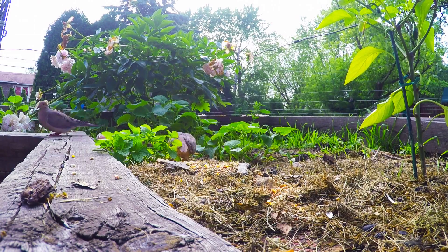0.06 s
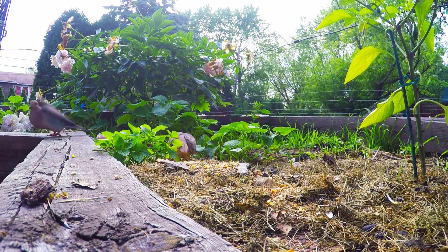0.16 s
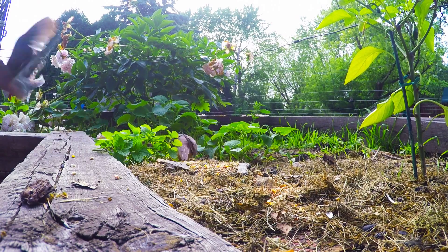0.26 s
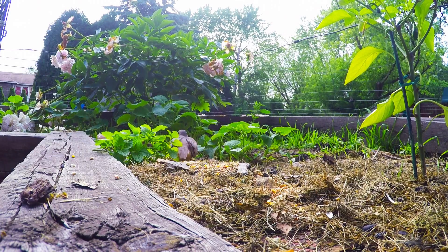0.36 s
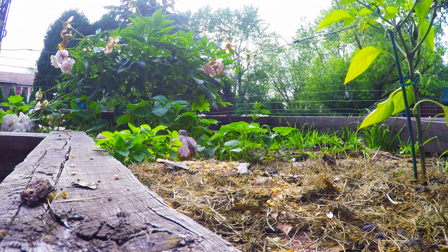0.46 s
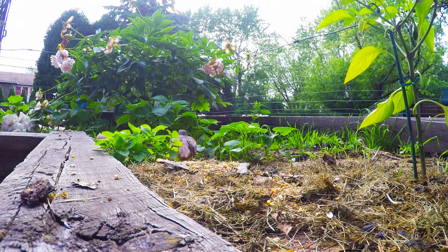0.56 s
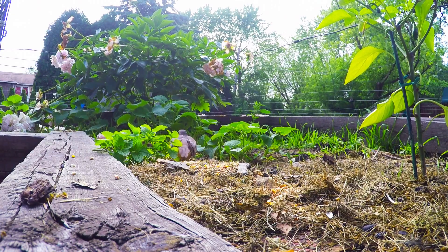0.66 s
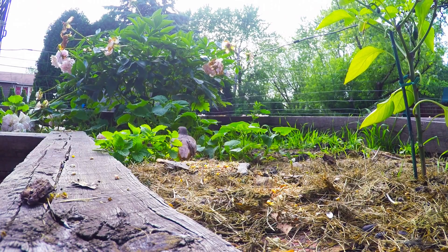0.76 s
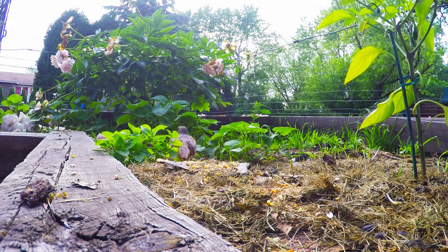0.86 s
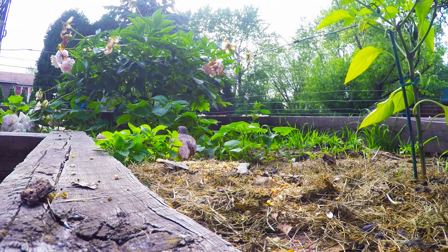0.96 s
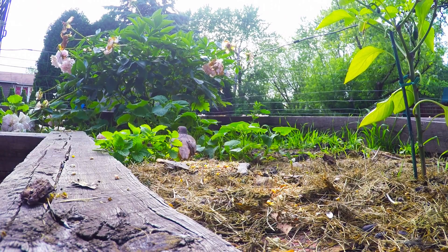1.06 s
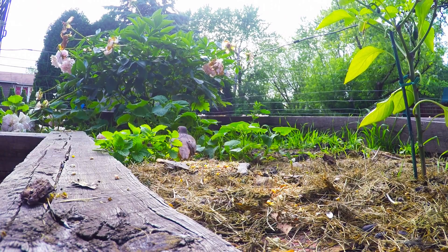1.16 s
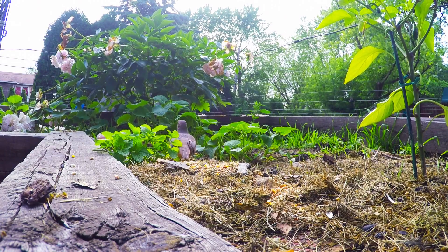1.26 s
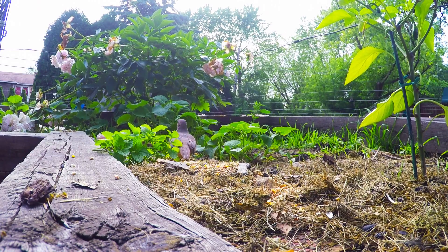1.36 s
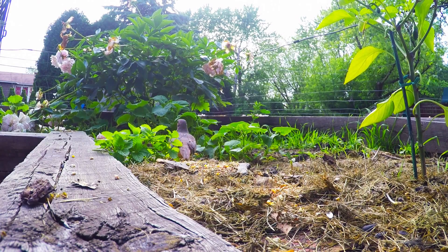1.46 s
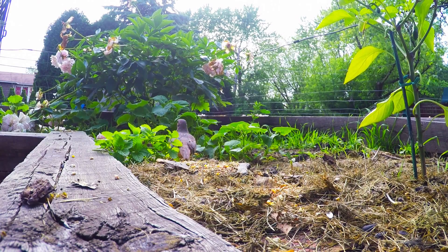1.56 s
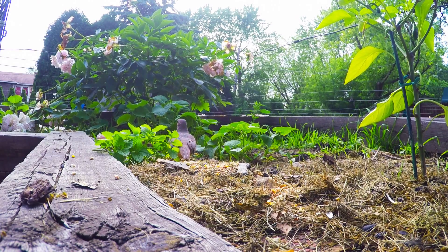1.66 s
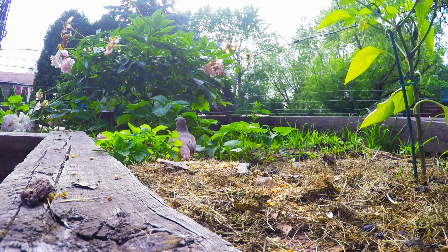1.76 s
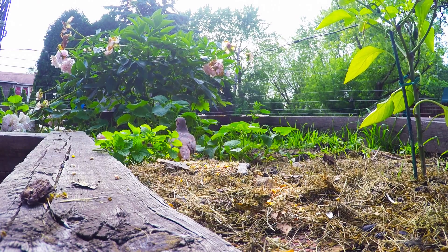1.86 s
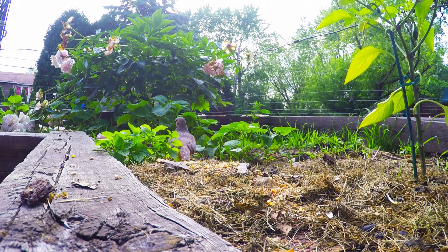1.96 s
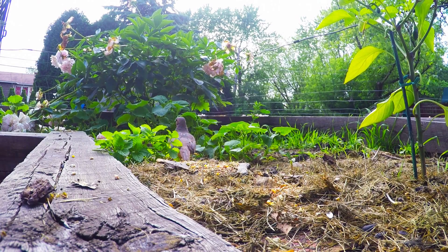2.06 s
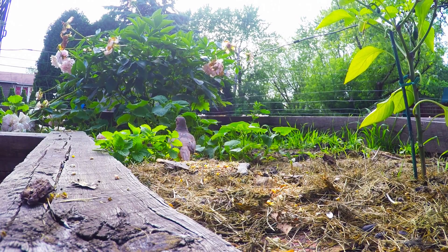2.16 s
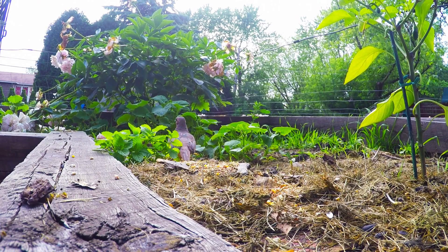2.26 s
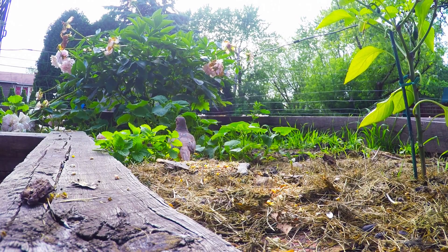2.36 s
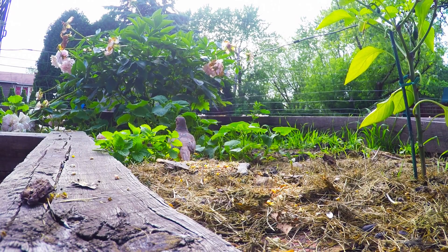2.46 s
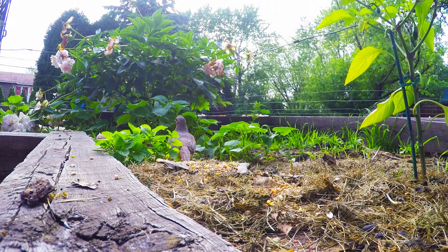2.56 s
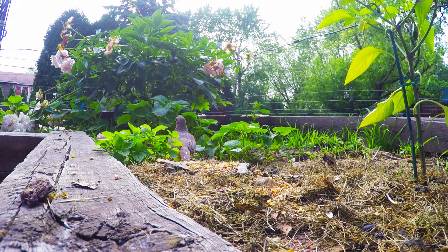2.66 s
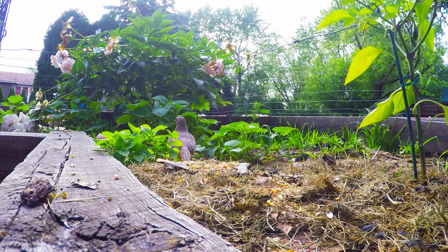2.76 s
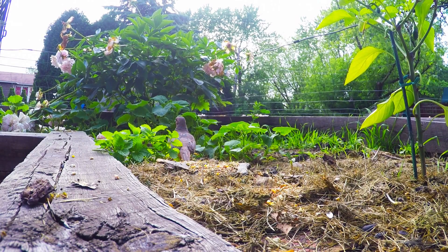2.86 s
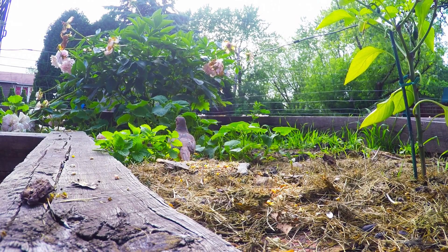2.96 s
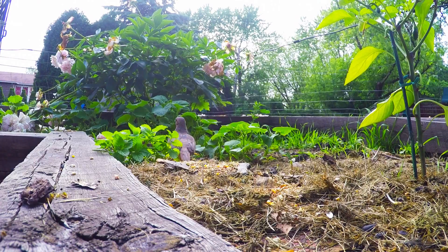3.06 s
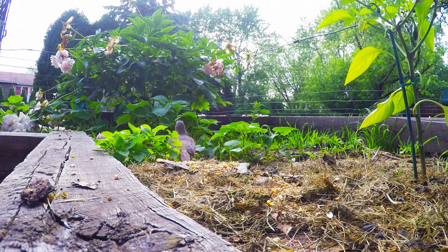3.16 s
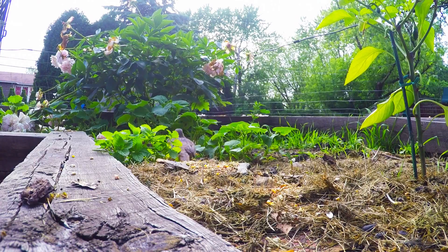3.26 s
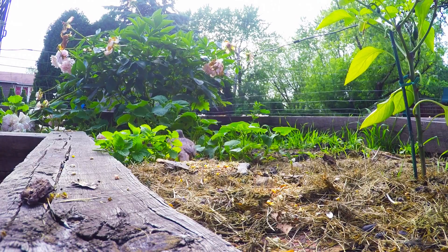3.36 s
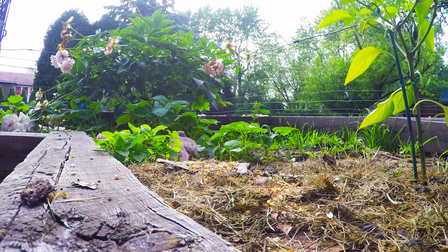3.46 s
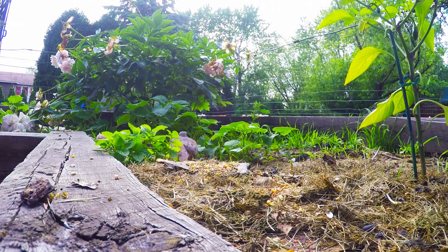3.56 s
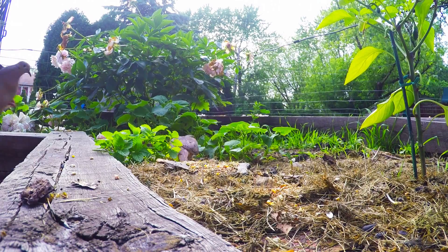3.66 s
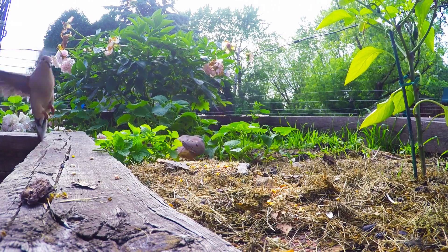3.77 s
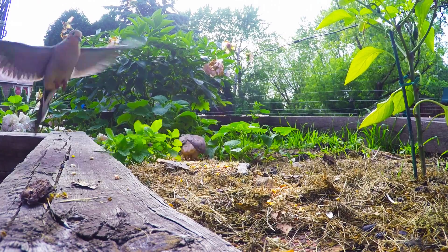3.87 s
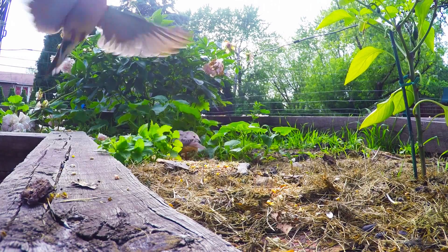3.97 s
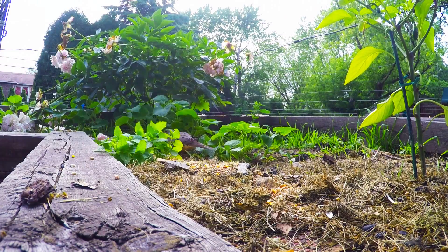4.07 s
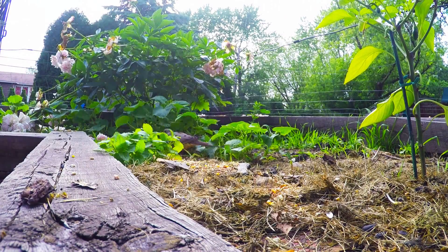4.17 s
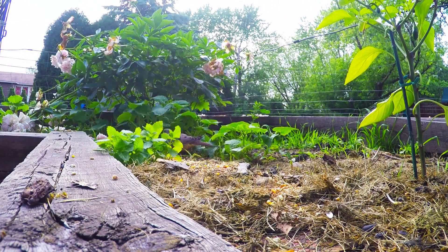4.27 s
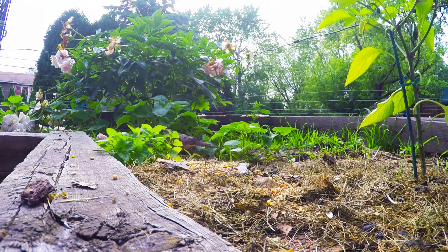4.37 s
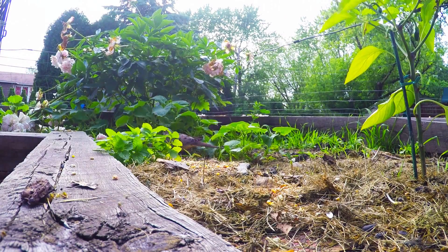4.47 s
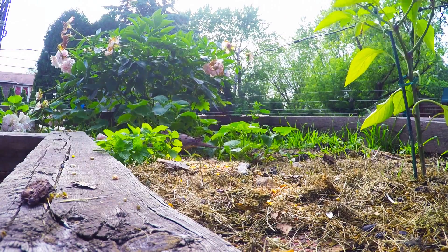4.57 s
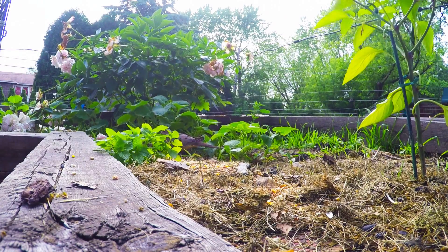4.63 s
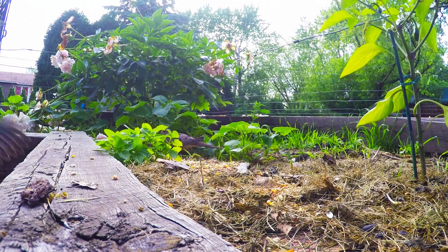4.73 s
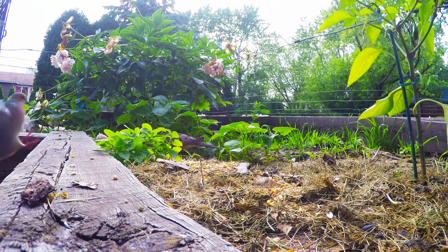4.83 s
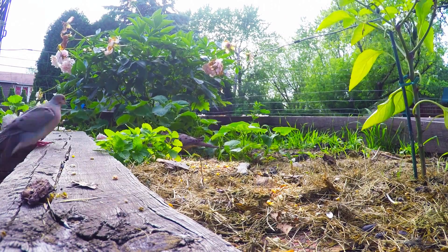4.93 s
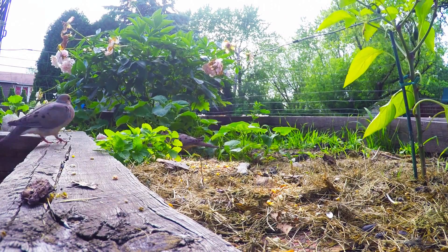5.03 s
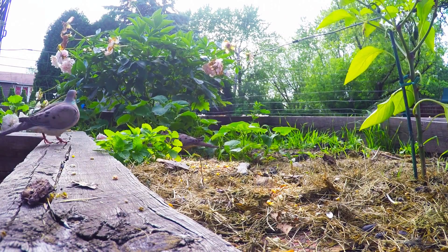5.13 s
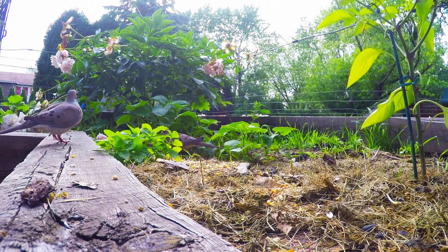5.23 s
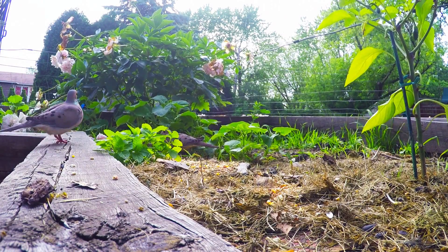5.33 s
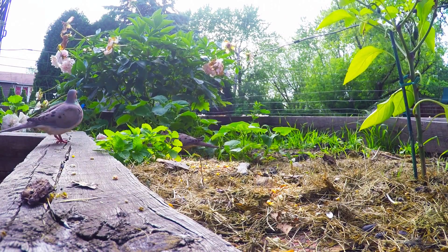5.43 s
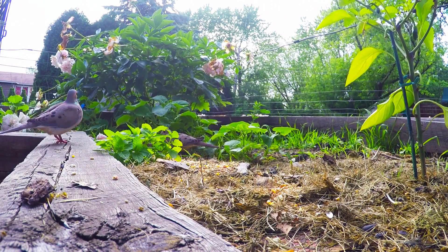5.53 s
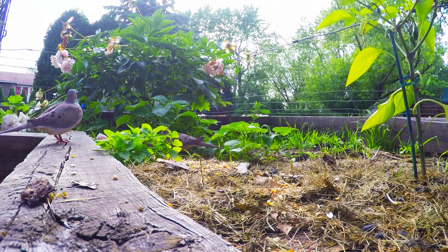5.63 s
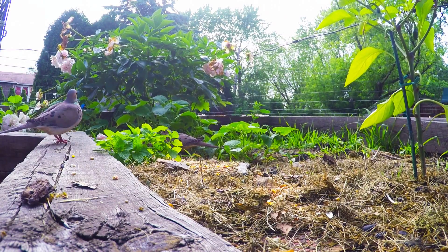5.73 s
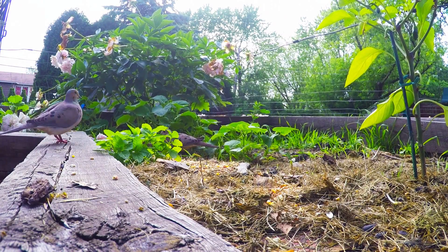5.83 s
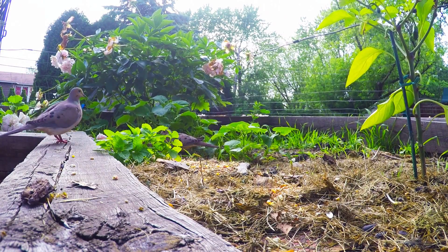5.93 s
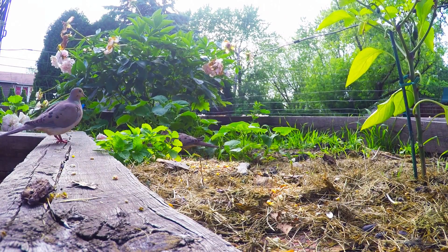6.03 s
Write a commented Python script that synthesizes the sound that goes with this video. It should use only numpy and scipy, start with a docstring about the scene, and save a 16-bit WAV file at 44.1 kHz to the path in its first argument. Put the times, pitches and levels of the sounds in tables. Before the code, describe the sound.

Fast squeaky wing whistles of a dove taking off, a quiet town-rumble pause with faint birds, then thudding, whistling wingbeats as one lands.

```python
"""A steady town rumble with a faint hiss is heard first; a dove then takes off from a garden sleeper beside
the microphone, and later a dove flies in and lands on it. Each wing stroke is an arched feather whistle
(harmonic tones) in a rush of air (filtered noise); feathers slap and rustle (noise bursts), and the pushed
air buffets the microphone (pressure pulses). Small birds and short hoarse low calls, perhaps a dog's bark
or a dove's grunt, sound far off (gliding tones)."""
import sys
import numpy as np
from scipy import signal
from scipy.fft import rfft, irfft, next_fast_len
from scipy.io import wavfile

SR = 44100
rng = np.random.default_rng(int(sys.argv[2]) if len(sys.argv) > 2 else 0)


def int16_out(signal):
    """Quantize to a 16-bit WAV file."""
    q = np.round(np.clip(np.atleast_2d(signal).T, -1, 1) * 32767)
    wavfile.write(sys.argv[1], SR, q.astype(np.int16))


N = 268965

# spectrum of town rumble and leaf hiss, relative: [f/Hz, level/dB]
GARDEN_SPECTRUM = [(10, -56), (22, 1.5), (45, 3), (70, -1.5), (98, 0), (125, -9), (155, -16), (230, -21),
                   (330, -31), (600, -36), (1500, -42), (4200, -43.5), (7000, -51), (15000, -57.5)]
# spectrum of air and barbs rubbing along the wing, relative: [f/Hz, level/dB]
AIR_SPECTRUM = [(100, 42), (300, 4.5), (700, -7.5), (1300, 13), (2000, 7), (3000, 9.5), (4500, 5.5),
                (6000, 6), (8000, -0.5), (11000, -1.5), (16000, -11)]
# spectrum of feather and claw contacts before tilting, relative: [f/Hz, level/dB]
SLAP_SPECTRUM = [(120, 17), (400, 7.5), (1200, 5), (2300, 3.5), (3200, -1.5), (5000, -2.5), (8000, -8.5),
                 (15000, -18)]
# spectrum of the turbulence around a buffet, relative: [f/Hz, level/dB]
SWIRL_SPECTRUM = [(20, 7.5), (80, 26.0), (160, -16), (400, -40), (1500, -31), (8000, -100)]
# wingbeats: [downstroke t/s, length/s, top f/Hz before the stall sag, pitch bend (share),
#             place of the crest (0-1), whistle level/dB, air reference level/dB,
#             buffet level/dB before the capsule leak, buffet delay/s]
WINGBEATS = [ (0.286, .036, 2068, 0.26, 0.5, -33.5, -45, -18.5, 0.054),
             (0.357, 0.038, 2236, 0.31, 0.44, -30, -45, -20.5, 0.046),
             (0.437, 0.035, 2157, 0.186, .35, -37, -45.5, -19.5, 0.0416),
             (0.531, 0.034, 2146, 0.12, 0.52, -35, -46, -18, .02),
             (.647, 0.024, 1910, .07, 0.46, -25.5, -44, -15.5, 0.016),
             (0.778, 0.019, 1837, 0.043, 0.3, -35, -47, -21.5, 0.0068),
             (1.071, .025, 1800, 0.028, 0.32, -44.5, -55, -29, 0.0079),
             (1.154, 0.031, 2042, 0.15, 0.64, -39.5, -57.5, -28, 0.041),
             (1.241, 0.025, 1877, 0.19, 0.42, -52, -59.5, -37, 0.028),
             (3.225, .025, 1970, 0.051, 0.3, -52, -51, -24.5, 0.0084),
             (3.377, 0.053, 1764, 0.23, 0.23, -58, -53.5, -25.5, 0.042),
             (3.47, 0.028, 1920, 0.072, 0.68, -50, -50.5, -29.5, 0.026),
             (3.562, 0.034, 1995, 0.13, 0.47, -42.5, -52.5, -22.5, 0.039),
             (3.664, 0.039, 1990, 0.086, 0.6, -44, -50.5, -27.5, 0.033),
             (3.793, 0.03, 2230, 0.36, 0.41, -43, -48.5, -20.5, 0.0083),
             (3.86, .036, 2184, 0.153, 0.4, -44.5, -46, -14, 0.034),
             (3.952, 0.025, 2185, 0.14, 0.7, -43.5, -47.5, -17.5, 0.0294),
             (4.034, .032, 2145, 0.14, 0.52, -45, -48.5, -9, 0.0342),
             (4.128, 0.026, 2105, 0.052, 0.83, -35, -49, -5, .03),
             (4.205, 0.033, 2083, 0.069, .8, -36.5, -48.5, -12, 0.042),
             (4.382, 0.033, 2076, 0.15, 0.47, -36, -46, -14.5, 0.0068),
             (4.51, 0.03, 2028, 0.12, .85, -38.5, -48, -17, 0.0087),
             (4.635, 0.035, 1906, 0.047, 0.68, -44, -51, -21.5, 0.0089),
             (4.789, 0.028, 2068, 0.26, 0.5, -37.5, -49, -20, 0.027)]
# wing tips striking, brushes and claw ticks: [t/s, level/dB, fading time/s, tilt above 1 kHz/(dB/octave)]
SLAPS = [ (.351, -22.5, 0.001, 2), (.356, -35, 0.0053, -12), (.421, -38.5, 0.014, -1.5),
         (.945, -55.5, .016, 3), (1.215, -50, 0.0103, -11), (1.256, -45, 0.016, -4),
         (1.31, -47, 0.016, -16), (2.5, -42, .0025, 19), (3.159, -54.5, 0.0087, 4.5), (3.546, -47, 0.01, 1),
         (3.837, -38.5, 0.017, -1.5), (3.853, -35, 0.0032, -7), (4.113, -40, 0.0029, 2),
         (4.237, -40.5, 0.0062, -1), (4.367, -47.5, .008, 2), (4.83, -47, 0.007, 1.5),
         (5.909, -52, .003, 5.5), (6.046, -52.5, 0.0047, 3)]
# whistle overtones, relative to one another: [multiple of the fundamental, level/dB]
OVERTONES = [(2, -5.5), (3, -10.5), (4, -18.5), (5, -23), (6, -25.5), (7, -28)]
# all overtones against the fundamental, highest while the dove hovers close by: [t/s, level/dB]
OVERTONE_LEVEL = [(.29, -7.5), (.47, -1.5), (.65, -6.5), (1.15, -5.5), (3.8, -9), (3.98, 3), (4.12, -4),
                  (4.55, -6), (4.79, -4.5)]
# low flutter of the feathers as the wing turns: [t/s, f/Hz, level/dB]
FLUTTERS = [ (0.332, 1450, -32), (0.407, 1330, -37), (0.774, 1146, -51.5), (0.94, 1253, -51),
            (1.072, 1277, -45), (3.389, 1353, -51), (3.463, 1250, -50.5), (3.528, 1103, -50),
            (3.556, 1304, -44.5), (3.66, 1280, -46), (3.828, 1193, -36), (3.925, 980, -51),
            (4.009, 1000, -46.5), (4.093, 990, -50.5), (4.404, 1240, -48)]
# distant small birds: [t/s, length/s, first f/Hz, middle f/Hz, last f/Hz, level/dB at the source, rasp (0-1)]
CHIRPS = [ (1.285, 0.056, 3940, 4420, 4750, -63.5, .1), (1.618, 0.045, 4570, 4420, 4130, -54, 0.93),
          (1.658, 0.049, 3320, 4190, 3890, -51, 0.2), (1.675, 0.05, 2920, 2900, 2510, -52.5, 0.49),
          (1.875, .043, 6560, 6850, 6900, -66.5, 0.1), (4.305, .037, 6020, 5100, 4500, -63.5, .05),
          (4.552, 0.12, 3330, 3330, 2930, -63.5, 0.45), (5.11, 0.052, 4100, 4000, 4150, -60.5, 0.4),
          (5.129, 0.038, 2010, 2840, 3840, -59, 0), (5.171, 0.022, 4150, 3710, 3300, -53.5, 0.17),
          (5.175, 0.046, 3580, 3330, 2830, -58, 0), (5.71, 0.027, 4080, 4250, 4400, -62, 0.1)]
# short hoarse low calls far off, perhaps a dog's bark or a dove's grunt:
# [t/s, length/s, first f/Hz, middle f/Hz, last f/Hz, level/dB at the source, rasp (0-1)]
LOW_CALLS = [(2.115, 0.18, 436, 454, 459, -51.5, 1), (3.09, 0.162, 461, 493, 483, -55.5, 0.34)]

GARDEN_DB = -38.5
TOP_HZ = 15600  # upper limit of the recorded band
HARD_GAP_S, EASY_GAP_S = 0.082, 0.123  # time to the nearest other beat in hard flapping and easy flight

# pairs: (easy flight, hard flapping)
RUSTLE_DB = (-11.5, -7.5)  # sliding feathers, relative to the air reference
CLAP_DB = (-2, 6.5)  # wings meeting, relative to the air reference
STALL_SAG = (0.032, 0.1)  # share of the pitch lost at the end of the stroke
STALL_DB = (-33, -8)  # falling squeal, relative to the whistle
BUFFET_WIDTH_S = (0.0091, 0.0065)  # half width of the suction
SWIRL_DB = (-22.5, -21)  # turbulence, relative to the buffet

RUSTLE_LEAD_S, RUSTLE_S = 0.022, 0.17
CLAP_LEAD_S, CLAP_FADE_S, CLAP_TILT_DB = 0.009, 0.00505, 0  # tilt per octave
STALL_S, STALL_OVERLAP_S = 0.0157, 0.012  # length, and lead before the end of the stroke
STALL_PITCH = (0.94, 0.753)  # first and last pitch, as shares of the top pitch
FLUTTER_S = 0.01385


def undb(db):
    """Amplitude gain is ten to the power of a twentieth of the level in decibels."""
    return 10 ** (np.asarray(db) / 20)


def add(track, start, sound):
    """Superposition: sum a sound into a track at a time in seconds."""
    i = int(start * SR)
    track[i:i + len(sound)] += sound[:max(len(track) - i, 0)]


def noise(spectrum, tilt_db=0, size=N):
    """Spectral shaping: white noise weighted in frequency, tilted above 1 kHz in dB/octave, at unit level."""
    f = np.maximum(np.fft.rfftfreq(size, 1 / SR), 1)
    hz, db = np.transpose(spectrum)
    octaves_above_1k = np.maximum(np.log2(f / 1000), 0)
    shape_db = np.interp(np.log(f), np.log(hz), db) + tilt_db * octaves_above_1k
    x = irfft(rfft(rng.standard_normal(size)) * undb(shape_db), size)
    return x / x.std()


def wander(rate, n, size=16384):
    """Low-passed noise: smooth random motion of unit spread, up to about rate turns a second."""
    size = next_fast_len(max(size, n))
    lowpass = np.exp(-(np.fft.rfftfreq(size, 1 / SR) / rate) ** 2)
    x = irfft(rfft(rng.standard_normal(size)) * lowpass, size)
    return x[:n] / x.std()


def progress(length):
    """Normalised time: a ramp from 0 to 1 over a length in seconds."""
    return np.linspace(0, 1, int(length * SR))


def arch(u, crest):
    """Skewed half sine: 0 at both ends and 1 at the crest."""
    return np.abs(np.sin(np.pi * np.interp(u, [0, crest, 1], [0, .5, 1])))


def phase_of(hz):
    """Phase is the running integral of angular frequency."""
    return 2 * np.pi * np.cumsum(hz) / SR


def efforts():
    """Effort grows with beat rate: 0-1 for each beat, higher the nearer its closest neighbour."""
    gaps = np.diff([beat[0] for beat in WINGBEATS])
    nearest = np.minimum(np.r_[np.inf, gaps], np.r_[gaps, np.inf])
    return np.clip((EASY_GAP_S - nearest) / (EASY_GAP_S - HARD_GAP_S), 0, 1)


def by_effort(pair, effort):
    """Linear interpolation from easy flight to hard flapping."""
    easy, hard = pair
    return easy + effort * (hard - easy)


def garden():
    """Stationary background noise: town rumble under a faint, even hiss of leaves."""
    return noise(GARDEN_SPECTRUM) * undb(GARDEN_DB)


def rush(lead=0.026, trail=0.027, grain_db=3.54, flow_db=-1):
    """Flow and friction noise: air tears past the wing on every stroke, and feathers rustle together."""
    flow = np.zeros(N)
    for (start, length, _, _, crest, _, air_db, _, _), effort in zip(WINGBEATS, efforts()):
        stroke = arch(progress(lead + length + trail), crest) ** 2
        add(flow, start - lead, undb(air_db + flow_db) * stroke)
        # the rustle lasts through the upstroke, so hard beats run into each other
        rustle_db = air_db + by_effort(RUSTLE_DB, effort)
        add(flow, start - RUSTLE_LEAD_S, undb(rustle_db) * arch(progress(RUSTLE_S), 0.31))
    # barbs catch and let go, so each band scratches on its own
    air = noise(AIR_SPECTRUM)
    edges = 150 + (TOP_HZ - 150) * np.linspace(0, 1, 13) ** 2
    scratch = np.zeros(N)
    for low, high in zip(edges, edges[1:]):
        band = signal.butter(2, (low, high), "band", fs=SR, output="sos")
        scratch += signal.sosfilt(band, air) * undb(2.2 * wander(300, N))
    scratch *= undb(grain_db * wander(880, N))  # grain shared by all bands
    return flow * scratch / scratch.std()


def claps():
    """Impact grows with effort: the wings meet just before each downstroke; rows as in SLAPS."""
    rows = []
    for (start, *_, air_db, _, _), effort in zip(WINGBEATS, efforts()):
        db = air_db + by_effort(CLAP_DB, effort)
        rows.append((start - CLAP_LEAD_S, db, CLAP_FADE_S, CLAP_TILT_DB))
    return rows


def slaps(rise_share=0.5, grain_db=1.5):
    """Impact noise of feathers and claws: short contacts crack, longer ones swell and brush."""
    out, t = np.zeros(N), np.arange(8192) / SR
    for start, db, fade, tilt_db in claps() + SLAPS:
        rise = rise_share * fade
        envelope = np.minimum(t / rise, np.exp((rise - t) / fade))
        burst = noise(SLAP_SPECTRUM, tilt_db, size=len(t)) * undb(grain_db * wander(770, len(t)))
        add(out, start - rise / 2, undb(db) * burst * envelope)
    return out


def whistles(jitter=0.014, buzz=0.013, shimmer_db=2, swell=0.54, attack=0.0044, fade=0.37,
             neighbour_db=-12, spread=0.07, rough_bend=0.14, overtone_flicker_db=2.5):
    """Aeroelastic flutter: outer feathers sing with pitch and level following the wing's speed."""
    out = np.zeros(N)
    for (start, length, top_hz, bend, crest, db, *_), effort in zip(WINGBEATS, efforts()):
        u = progress(length)
        speed = arch(u, crest)
        # the pitch arches, then sags as the wing stalls
        arched = 1 - bend * 2 * (u - crest) ** 2 / max(crest, 1 - crest)
        sag = 1 - by_effort(STALL_SAG, effort) * u ** 10
        pitch = top_hz * arched * sag
        # a feather starts to sing abruptly once the air is fast enough
        loud = speed ** swell * np.clip(u * length / attack, 0, 1) * (1 - fade * u)
        bright = undb(np.interp(start, *np.transpose(OVERTONE_LEVEL)))
        # strongly bent strokes are rough and set the neighbouring feathers singing too
        rough = np.clip(bend / rough_bend, .55, 1.6)
        neighbour = rough * undb(neighbour_db)
        feathers = ((1, 1), (1 - spread, neighbour), (1 + spread, neighbour * rough / 2))
        for ratio, share in feathers:
            waver = jitter * wander(310, len(u)) + buzz * wander(1500, len(u))
            phase = phase_of(pitch * ratio * (1 + rough * waver))
            upper = np.zeros(len(u))
            for multiple, overtone_db in OVERTONES:
                flicker_db = overtone_flicker_db * wander(300, len(u))
                upper += undb(overtone_db + flicker_db) * np.sin(multiple * phase)
            tone = np.sin(phase) + bright * np.sqrt(speed) * upper
            gain = undb(db + rough * shimmer_db * wander(130, len(u)))
            add(out, start, np.sqrt(2) * share * tone * loud * gain)
    return out


def stalls(jitter=0.031, overtone_db=-4):
    """Stall flutter: feathers squeal downwards at the bottom of the stroke, strongest in hard flapping."""
    out, u = np.zeros(N), progress(STALL_S)
    for (start, length, top_hz, _, _, db, *_), effort in zip(WINGBEATS, efforts()):
        pitch = top_hz * np.interp(u ** 2, [0, 1], STALL_PITCH)
        phase = phase_of(pitch * (1 + jitter * wander(470, len(u))))
        squeal = np.sin(phase) + undb(overtone_db) * np.sin(2 * phase)
        gain = np.sqrt(2) * undb(db + by_effort(STALL_DB, effort))
        add(out, start + length - STALL_OVERLAP_S, gain * arch(u, 0.53) * squeal)
    return out


def flutters(jitter=0.053):
    """Low-speed flutter: as the wing turns, slower air makes the feathers sound low and rough."""
    out, u = np.zeros(N), progress(FLUTTER_S)
    for start, hz, db in FLUTTERS:
        phase = phase_of(hz * (1 + jitter * wander(250, len(u))))
        add(out, start, np.sqrt(2) * undb(db) * arch(u, 0.79) * np.sin(phase))
    return out


def buffets(leak_hz=24):
    """Vortex shedding: each stroke's vortex passes as push, suction, push, with a little turbulence."""
    out, swirl, t = np.zeros(N), np.zeros(N), np.arange(-4096, 4096) / SR
    for (start, *_, db, delay), effort in zip(WINGBEATS, efforts()):
        u = t / by_effort(BUFFET_WIDTH_S, effort)
        onset = start + delay + t[0]
        pulse = (u ** 2 - 1) * np.exp(-u ** 2 / 2)
        add(out, onset, undb(db) * pulse)
        add(swirl, onset, undb(db + by_effort(SWIRL_DB, effort)) * np.exp(-(u / 5.5) ** 2))
    pressure = out + swirl * noise(SWIRL_SPECTRUM)
    # the capsule leaks slow pressure, so each suction rebounds
    return signal.sosfilt(signal.butter(1, leak_hz, "high", fs=SR, output="sos"), pressure)


def calls(table, rasp_rate, rasp_depth, throb):
    """Modulated animal calls: a tone glides through three pitches, made hoarse by an unsteady voice."""
    out = np.zeros(N)
    for start, length, first, middle, last, db, rasp in table:
        u = progress(length)
        glide = np.polyval(np.polyfit([0, .5, 1], [first, middle, last], 2), u)
        tone = np.sin(phase_of(glide * (1 + rasp * rasp_depth * wander(rasp_rate, len(u)))))
        # a hoarse note also rattles, which puts side tones around it
        rattle_hz = rasp_rate * (1 + 0.14 * wander(40, len(u)))
        rattle = 1 + throb * rasp * np.sin(phase_of(rattle_hz))
        add(out, start, undb(db) * np.sqrt(2 * arch(u, 0.32)) * tone * rattle)
    return out


def echo(x, t60, damp_hz):
    """Diffuse scattering: convolution with decaying, low-passed noise of unit energy."""
    t = np.arange(SR // 2) / SR
    decay = np.exp(-np.log(1000) * t / t60)  # falls 60 dB in t60 seconds
    tail = rng.standard_normal(len(t)) * decay * np.minimum(t / 0.012, 1)
    tail = signal.sosfilt(signal.butter(1, damp_hz, fs=SR, output="sos"), tail)
    return signal.fftconvolve(x, tail / np.linalg.norm(tail))[:N]


def scene():
    """Superposition of the open air, the near dove and the far voices."""
    background = garden()
    wings = rush() + slaps() + whistles() + stalls() + flutters()
    # open air: the near bird gets only a brief scatter from the ground and plants
    near = wings + undb(-24) * echo(wings, t60=0.1, damp_hz=8000) + buffets()
    # distant voices arrive a little blurred by trees and houses
    chirps = calls(CHIRPS, rasp_rate=190, rasp_depth=0.124, throb=1.0)
    low_calls = calls(LOW_CALLS, rasp_rate=57, rasp_depth=0.062, throb=2.1)
    voices = chirps + low_calls
    far = undb(-3) * voices + undb(-11) * echo(voices, t60=0.32, damp_hz=7000)
    return (background + near + far)[None]


def record(dry):
    """Band limiting: the recorder cuts the top with a steep elliptic low-pass."""
    return signal.sosfilt(signal.ellip(10, .1, 70, TOP_HZ, fs=SR, output="sos"), dry)


dry = scene()
out = record(dry)
int16_out(out)
```